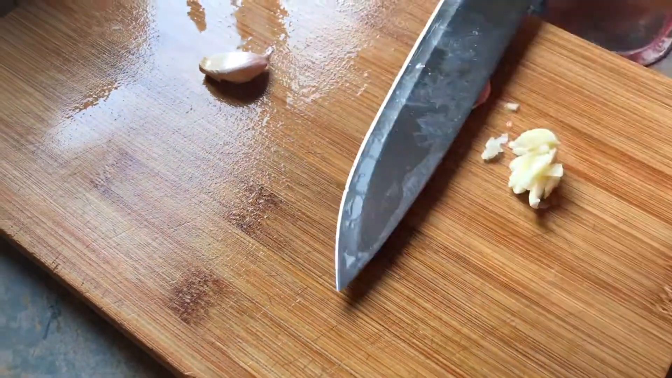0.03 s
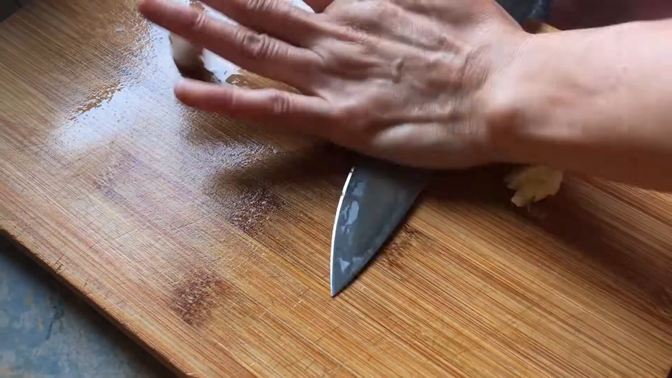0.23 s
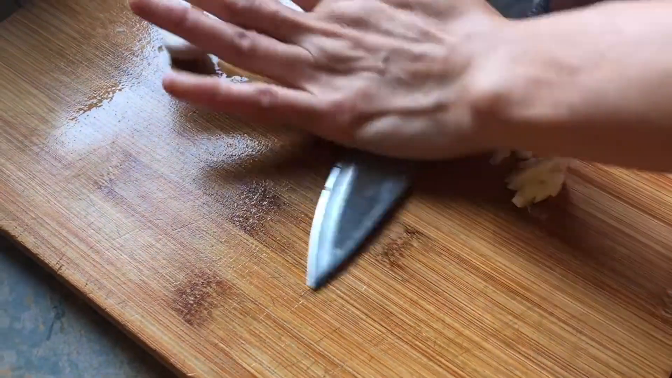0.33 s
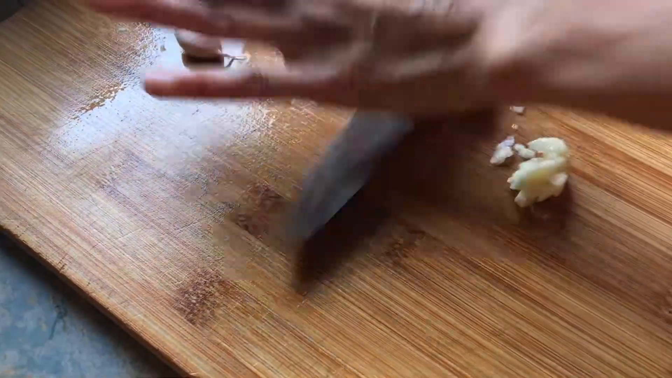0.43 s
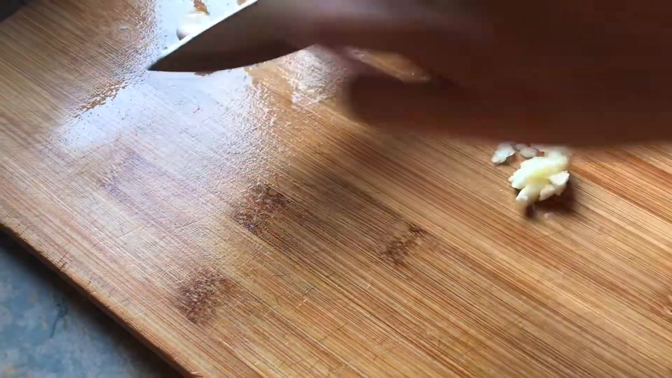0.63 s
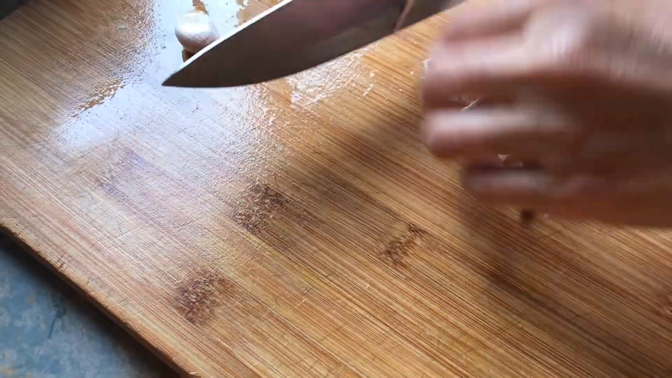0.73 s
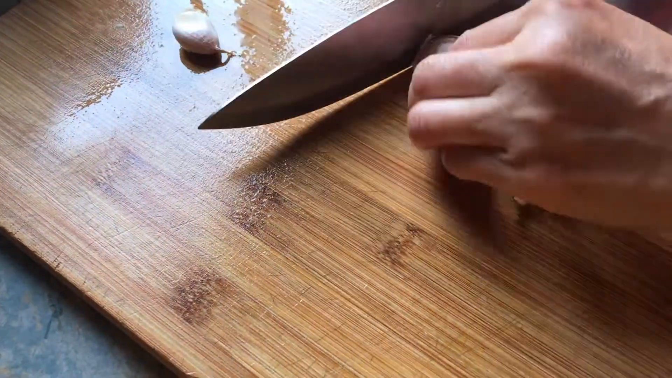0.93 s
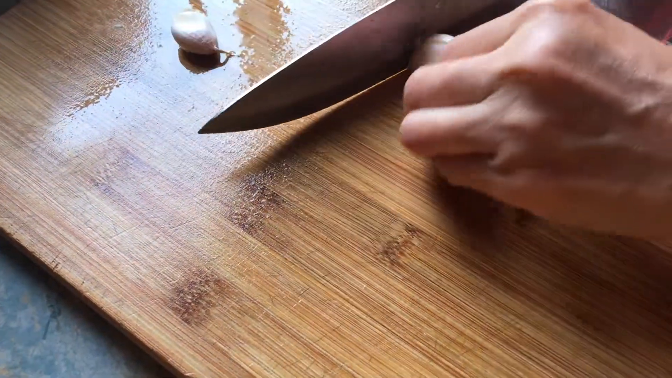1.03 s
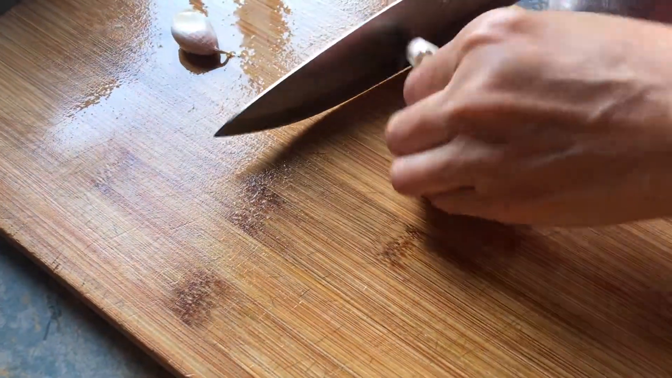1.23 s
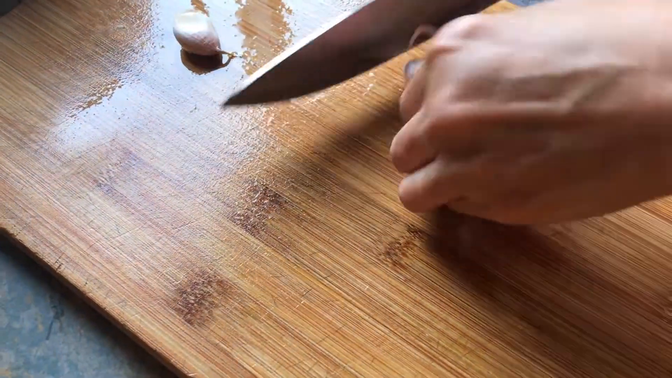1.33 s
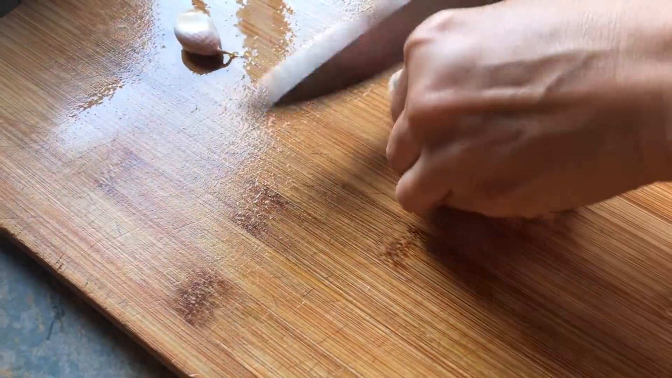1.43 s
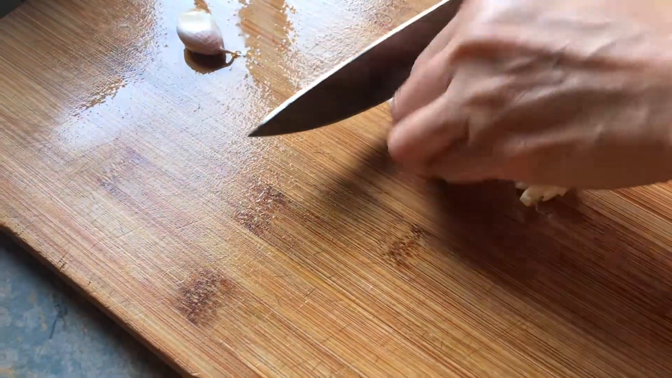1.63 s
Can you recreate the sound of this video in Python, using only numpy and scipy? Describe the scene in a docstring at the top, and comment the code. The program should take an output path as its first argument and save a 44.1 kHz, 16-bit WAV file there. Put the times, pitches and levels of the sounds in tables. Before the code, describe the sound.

Garlic cracks under a slammed knife blade, followed by one sharp chop and faint skin crackles.

```python
"""A small kitchen, a phone microphone close to a wooden chopping board; a low hum and a faint hiss.
A palm slams the flat of a chef's knife on a garlic clove: the clove cracks, board and counter thump.
The knife is lifted, set down and chopped once on the board. Fingers then work the papery skin,
which crackles. The room rings briefly after each sound."""
import sys
import numpy as np
from scipy import signal
from scipy.fft import rfft, irfft
from scipy.io import wavfile

SR = 44100
rng = np.random.default_rng(int(sys.argv[2]) if len(sys.argv) > 2 else 0)


def master(y):
    """Save y as 16-bit WAV."""
    cut = np.clip(np.atleast_2d(y).T, -1, 1)
    pcm = np.round(cut * 32767)  # scale
    wavfile.write(sys.argv[1], SR, pcm.astype(np.int16))


N = 74970


def amp(db):
    """dB to gain."""
    return 10 ** (np.asarray(db) / 20)


def unit(x):
    """Scale to rms 1."""
    return x / np.sqrt(np.mean(x ** 2))


def colour(x, points):
    """Filter by (freq_hz, gain_db) points, joined straight on a log-frequency axis."""
    hz, db = np.array(points, float).T
    f = np.maximum(np.arange(len(x) // 2 + 1) * SR / len(x), 1)
    return irfft(rfft(x) * amp(np.interp(np.log(f), np.log(hz), db)), len(x))


def noise_band(samples, hz, octaves):
    """Noise in a smooth band around hz, octaves wide (0.2 at least)."""
    f = np.maximum(np.arange(samples // 2 + 1) * SR / samples, 1)
    band = np.exp(-2 * (np.log2(f / hz) / max(octaves, .2)) ** 2)
    return irfft(rfft(rng.standard_normal(samples)) * band, samples)


def fade(t, t60):
    """Exponential decay, 60 dB down after t60 seconds."""
    return np.exp(-np.log(1000) * t / max(t60, .001))


def burst(noise, t60):
    """Noise dying away, its energy set by the decay time alone."""
    shape = fade(np.arange(len(noise)) / SR, t60)
    return noise * shape * np.sqrt(np.sum(shape ** 2) / np.sum((noise * shape) ** 2))


def add(out, start_s, x):
    """Mix x into out from start_s."""
    i = int(start_s * SR)
    out[i:i + len(x)] += x[:len(out) - i]


def struck(blows, modes):
    """Bell-shaped pulses of force ring an object's modes; a longer contact sounds duller."""
    t = np.arange(N) / SR
    force = sum(amp(db) * np.exp(-8 * ((t - start_s) * 1000 / ms - 1) ** 2) / (ms * SR / 1000)
                for start_s, db, ms in blows)
    t = t[:SR // 2]
    ring = sum(amp(db) * fade(t, t60) * np.cos(2 * np.pi * hz * t) for hz, db, t60 in modes)
    spread_s = .0008  # the blow takes this long to spread through the object
    return signal.fftconvolve(force, (1 - np.exp(-t / spread_s)) * ring)[:N]


def kitchen_tone():
    """Steady room tone with a faint hiss, and a low hum that wavers."""
    # freq_hz, gain_db
    spectrum = [(53, -44), (90, 0), (215, -4.5), (319, -1.5), (396, -11.5), (452, -15.5), (550, -14),
                (627, -17.5), (869, -17), (1710, -27), (9570, -39), (10700, -39), (15100, -38),
                (16500, -44.5)]
    tone_db, hum_hz, hum_db, waver_db = -64, 59, -61, -67
    tone = unit(colour(rng.standard_normal(N), [(45, -63.5)] + list(spectrum)))
    waver = unit(noise_band(N, hum_hz, octaves=40 / hum_hz))
    hum = np.sqrt(2) * np.sin(2 * np.pi * (hum_hz * np.arange(N) / SR + rng.random()))
    return amp(tone_db) * tone + amp(hum_db) * hum + amp(waver_db) * waver


def finger_rustle():
    """Fingers on skin and board: a dense, faint stream of tiny clicks."""
    # rise and fall of the rustle: time_s, level_db
    levels = [(0, -74.5), (0.179, -78), (.38, -63.5), (.45, -63), (0.499, -69), (0.534, -60.5),
              (.56, -71.5), (.63, -70), (.65, -100.5), (0.862, -83), (.905, -68.5), (1.0, -72.5),
              (1.2, -65.5), (1.278, -69), (1.328, -64.5), (1.42, -72), (1.5, -66), (1.549, -65),
              (1.6, -77.5), (1.7, -65)]
    # its spectrum: freq_hz, gain_db
    spectrum = [(400, -24.5), (1000, 0), (2500, -2.5), (5000, -5), (9000, -7), (13000, -6.5),
                (16500, -11.5)]
    clicks_per_s, spread_db = 8000, 2
    chance, polarity, size = rng.random((N, 3)).T
    clicks = (chance < clicks_per_s / SR) * np.sign(polarity - .5)
    clicks *= amp(-spread_db * np.log(size + 1e-9))
    level_db = np.interp(np.arange(N) / SR, *np.array(levels).T)
    return amp(level_db) * unit(colour(clicks, spectrum))


def skin_crackles():
    """The papery skin crackles, each time in a bright burst of noise."""
    # start_s, level_db, centre_hz, width_octaves, t60_ms
    crackles = [(0.1881, -48, 5700, 6, 13.5), (0.1991, -47, 4870, 6, 8), (.4120, -47, 4740, 2.5, 23.7),
                (0.4323, -33, 8300, 4.5, 2.8), (0.4367, -39.5, 3340, 0.6, 23),
                (0.4364, -44, 13000, 1.2, 5.4), (0.442, -67, 4130, 0.76, 9.9),
                (0.4723, -34.5, 11800, 0.77, 4.6), (0.482, -45, 4640, 0.65, 4.2),
                (.5250, -59, 1760, 1.1, 60), (.8980, -65, 5310, .3, 44), (0.94, -49, 12030, .8, 30),
                (1.1094, -40, 9400, 0.8, 3.4), (1.1134, -34, 13200, 1.07, 6.5),
                (1.1137, -39.5, 4570, 0.64, 2), (1.1400, -53, 13000, 0.51, 3.1),
                (1.1900, -58, 9830, 0.61, 3.6), (1.2030, -39.5, 9040, 1.7, 6),
                (1.196, -60.5, 2570, 0.48, 74), (1.2093, -46, 5900, 6, 18), (1.2295, -52, 12000, 0.46, 6.9),
                (1.255, -45, 7900, 3.7, 3.4), (1.299, -49.5, 9500, 0.65, 34), (1.3019, -38, 9250, 2.6, 7.3),
                (1.3118, -40, 10870, 0.7, 2.5), (1.3131, -39, 9600, 0.76, 4.3),
                (1.3250, -67.5, 8960, 0.19, 560), (1.4300, -71, 2353, 0.26, 450),
                (1.4660, -49, 3900, 2.8, 6.4), (1.4872, -54.5, 4970, 0.83, 5), (1.4930, -52, 13800, 0.2, 3),
                (1.5184, -49, 13350, 0.88, 16), (1.5234, -43, 4000, 1.5, 24), (1.5290, -38, 9100, 1.2, 9.9),
                (1.532, -40, 6500, 0.37, 10), (1.6300, -60.5, 8100, 2.2, 10), (1.6570, -56, 11000, 2, 10),
                (1.6750, -38.5, 9040, 3.8, 6), (1.6890, -47, 12000, 1, 3.2), (1.6920, -41, 10000, 2.9, 8.4),
                (1.6985, -49, 8800, 3.9, 2.9)]
    out = np.zeros(N)
    for start_s, db, hz, octaves, t60_ms in crackles:
        add(out, start_s, amp(db) * burst(noise_band(16384, hz, octaves), t60_ms / 1000))
    return out


def clove_crush():
    """The clove gives way under the blade in a few broad, gritty bursts."""
    # start_s, level_db, t60_ms, treble_tilt_db_per_octave
    cracks = [(0.2061, -32, 34.3, 4.5), (0.2079, -25.5, 11, 0.7), (.2113, -9.5, 7, 2),
              (0.2144, -18.5, 39, 2), (0.226, -36.5, 260, 3)]
    # spectrum of a crack before its tilt: freq_hz, gain_db
    spectrum = [(300, -30), (600, -11), (1150, -1.5), (1500, -3.5), (2200, 1.5), (3100, -2), (4200, -6.5),
                (6000, -10), (10000, -11.5), (14500, -11.5), (16500, -21)]
    out, samples, grit_spread_db = np.zeros(N), 8192, 2.8
    for start_s, db, t60_ms, tilt in cracks:
        grit = rng.standard_normal(samples) * amp(grit_spread_db * rng.standard_normal(samples))
        grit = colour(colour(grit, spectrum), [(1000, -2 * tilt), (16000, 2 * tilt)])
        add(out, start_s, amp(db) * burst(grit, t60_ms / 1000))
    return out


def counter_thumps():
    """Pushes pass through the board and ring the low modes of the counter."""
    # start_s, level_db, contact_ms
    pushes = [(.2110, -43, 3.2), (.2165, -11, 2.3), (.300, -30.5, 5.2), (.40, -37.5, 7.8), (.464, -41, 2.6),
              (.870, -41, 3.5), (.9420, -42, 2.7), (1.53, -37, 14.7)]
    # pitch_hz, level_db, t60_s
    counter_modes = [(45, -7.5, 0.42), (62.3, -11.5, 0.12), (78.7, -6, 0.23), (94.1, 4, 0.055),
                     (129, -14, .1), (174.6, -7, 0.14), (211.6, 0.5, 0.062), (263.7, -11.5, 0.18),
                     (297, -23.5, 0.74), (366.4, -7, 0.092)]
    return struck(pushes, counter_modes)


def knife_knocks():
    """Each knock rings the board and the blade, and the edge scuffs the wood."""
    # start_s, level_db, contact_ms, blade_relative_db, scuff_relative_db
    knocks = [(0.2122, -13.5, 0.43, -23.5, -6), (.2160, -20, 0.72, -22, -26), (0.4637, -31, 0.28, -24, -22),
              (.4668, -75, .6, -32, -20), (0.851, -52.5, 0.69, -40, -30.5),
              (0.8674, -32.5, 0.57, -36, -26.5), (.8740, -42, 1.6, -47.5, -43.5),
              (0.918, -57.5, 0.73, -40, -29), (.9390, -6.5, 0.29, -20.5, -31),
              (.9530, -15.5, 0.51, -43.5, -34.5), (0.9744, -26.5, 0.56, -42.5, -54),
              (0.998, -46, 0.86, -45, -39), (1.5228, -49.5, 0.1, -18, -1.5)]
    # pitch_hz, level_db, t60_s
    board_modes = [(287, -9.5, 0.036), (481.3, -17, 0.056), (674.8, -8.5, 0.051), (810, -13.5, .025),
                   (1015.6, 1.5, 0.02), (1098, 1, 0.043), (1219, -1.5, 0.035), (1347, 7, 0.012),
                   (1502.5, -5, 0.036), (1597, -9.5, 0.062), (1904, 2, 0.029), (2223, -5.5, 0.053),
                   (2620, -3, 0.036), (3030, -8.5, 0.029), (3080, -3.5, 0.031)]
    # pitch_hz, level_db, t60_s
    blade_modes = [(5200, -10, .015), (6713, -8, .02), (8716, 0, .055)]
    blade_contact_ms = .1
    board_blows = [knock[:3] for knock in knocks]
    blade_blows = [(start_s, db + blade_db, blade_contact_ms) for start_s, db, _, blade_db, _ in knocks]
    out = struck(board_blows, board_modes) + struck(blade_blows, blade_modes)
    for start_s, db, _, _, scuff_db in knocks:
        scuff = burst(noise_band(4096, hz=5000, octaves=.9), t60=.06)
        add(out, start_s, amp(db + scuff_db) * scuff)
    return out


def room_reflections(direct):
    """Dense reflections in the small kitchen, each band dying at its own rate."""
    # centre_hz, t60_s, density_db
    bands = [(120, 0.092, -29), (269, 0.46, -20), (500, 0.26, -11), (1000, 0.46, -22.5),
             (1873, 0.35, -22.5), (2700, 0.34, -20), (4570, 0.17, -16.5), (8400, 0.078, -13),
             (14000, .15, -28.5)]
    t, build_up_s = np.arange(SR // 2) / SR, .0035
    tail = np.zeros(len(t))
    for hz, t60, db in bands:
        band = unit(noise_band(len(t), hz, octaves=1.1))
        tail += amp(db) * band * fade(t, t60) * np.sqrt(hz / SR / 100)  # higher bands span more hertz
    return signal.fftconvolve(direct, tail * np.clip(t / build_up_s, 0, 1) ** 2)[:N]


def scene():
    """Mono, close to the board: the direct sound, its reflections and the room tone behind."""
    direct = knife_knocks() + clove_crush() + skin_crackles() + finger_rustle() + counter_thumps()
    return (direct + room_reflections(direct) + kitchen_tone())[None]


def record(dry):
    """The phone microphone drops the deepest bass and cuts the top."""
    low_cut_hz, high_cut_hz = 51.5, 16400
    low_cut = signal.butter(4, low_cut_hz, "high", fs=SR, output="sos")
    high_cut = signal.ellip(10, .2, 80, high_cut_hz, fs=SR, output="sos")
    return signal.sosfilt(high_cut, signal.sosfilt(low_cut, dry))


dry = scene()
out = record(dry)
master(out)
```